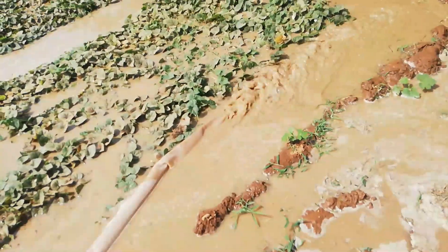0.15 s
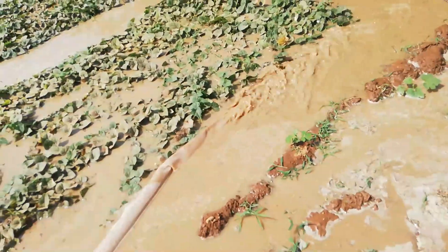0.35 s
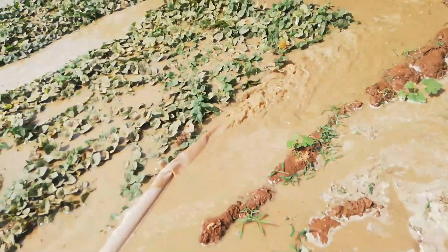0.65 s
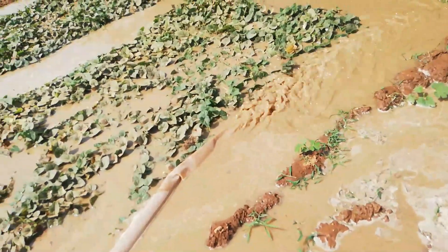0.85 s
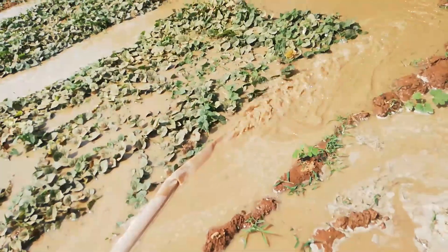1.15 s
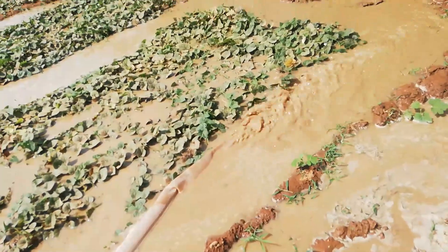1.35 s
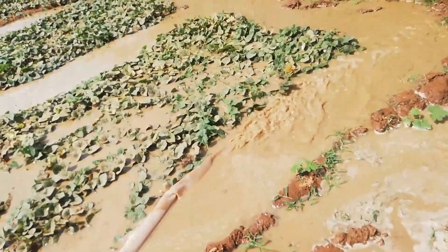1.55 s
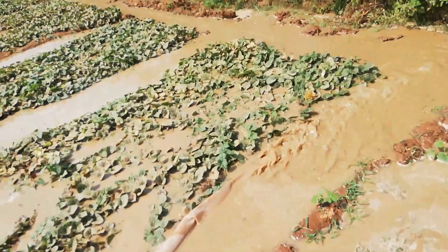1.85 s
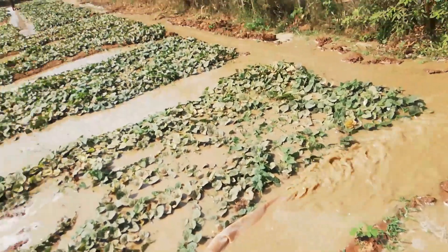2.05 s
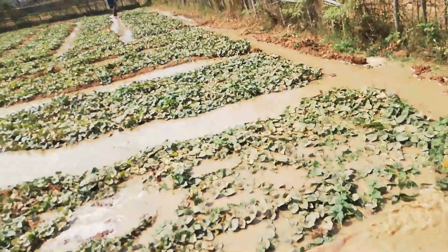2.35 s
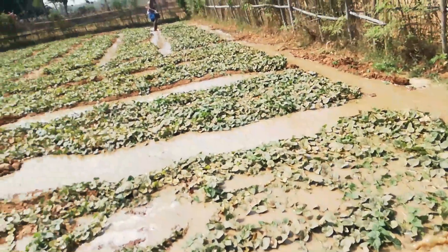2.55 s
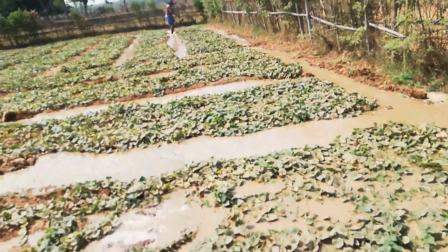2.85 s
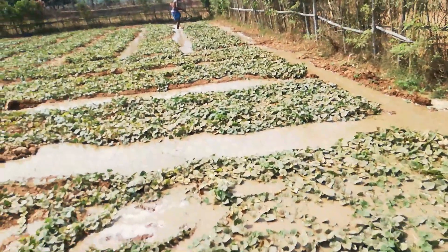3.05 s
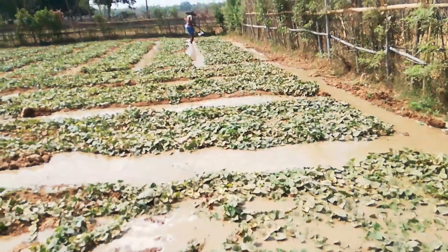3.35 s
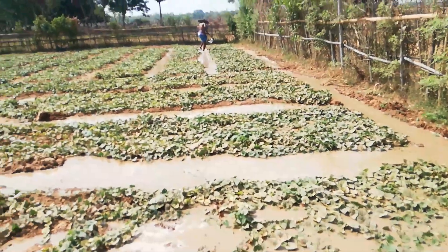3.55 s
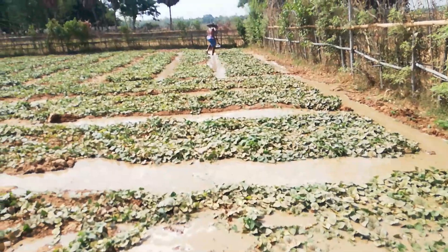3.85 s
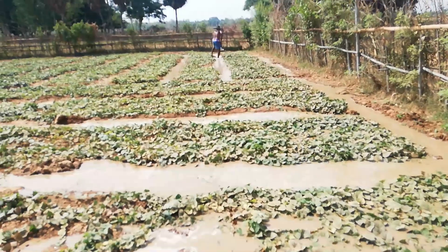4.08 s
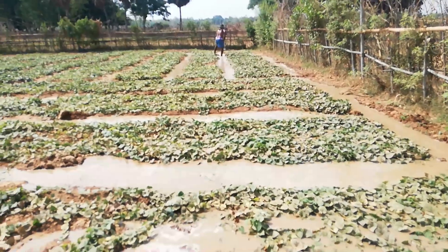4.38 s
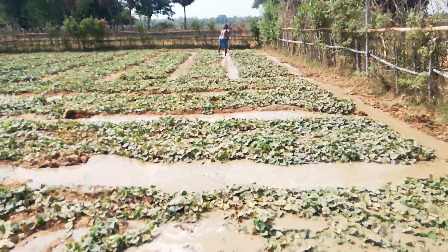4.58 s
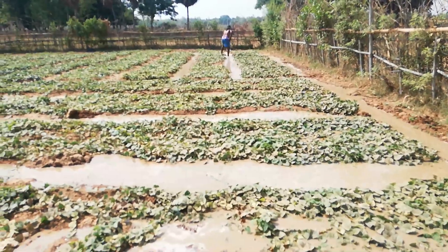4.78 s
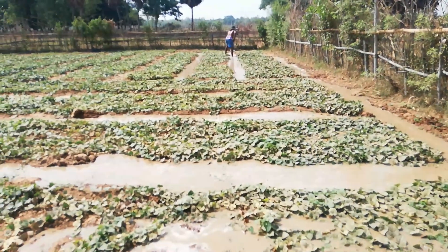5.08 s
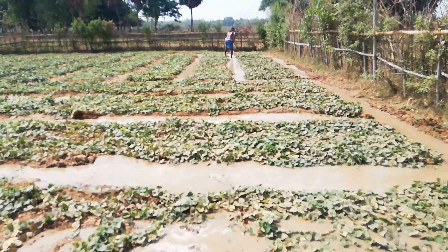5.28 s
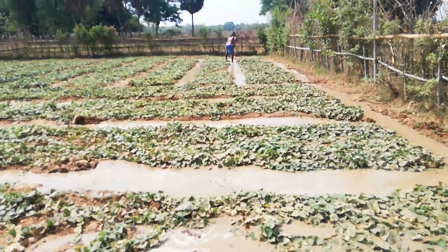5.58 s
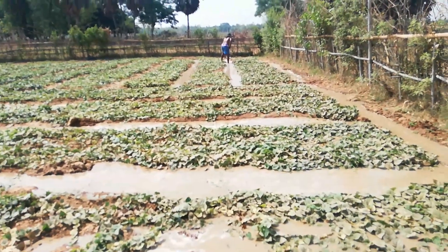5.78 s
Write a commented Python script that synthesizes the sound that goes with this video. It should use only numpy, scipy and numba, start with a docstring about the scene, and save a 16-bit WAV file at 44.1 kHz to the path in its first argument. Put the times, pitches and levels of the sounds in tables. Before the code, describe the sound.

Water gushes from a hose into a flooded field furrow, splashing and bubbling brightly, while a distant pump engine thumps softly outdoors.

```python
"""Water gushes from a hose into a flooded furrow, a step to the right of a hand-held phone that is tilted
up to the horizon. The splashing is thousands of short ringing bubbles, with loud single ones on top; they
reach the phone's two microphone ports with different colours and lags. Far off, a single-cylinder pump
engine thumps: its puffs ring an exhaust pipe. Light wind and a distant rumble are dark filtered noise.
"""
import sys
import numpy as np
from scipy import signal
from scipy.fft import rfft, irfft
from scipy.io import wavfile
from scipy.ndimage import uniform_filter1d
from numba import njit

SR = 44100
rng = np.random.default_rng(int(sys.argv[2]) if len(sys.argv) > 2 else 0)


def put_to_file(sound):
    """Save the sound as 16-bit audio at rate SR, in the file named by the first command-line argument."""
    columns = np.atleast_2d(sound).T  # one column per channel
    safe = np.clip(columns, -1, 1)
    whole_steps = np.round(safe * 32767)
    wavfile.write(sys.argv[1], SR, whole_steps.astype(np.int16))


N = 261072

# Tone of the distant rumble: [f/Hz, relative level/dB]
RUMBLE_COLOUR = [(12, -22), (25, -21), (80, -1.5), (130, -5.5), (200, -13.5), (280, -18.5), (370, -39.5),
                 (460, -33), (600, -63), (1000, -92)]
RUMBLE_DB = -57.5  # middle level, around which it drifts

# Wind gusts on the ports: [time of peak t/s, peak level/dB, time to fade by 10 dB/s (at least 0.03 is used)]
WIND_GUSTS = [(.66, -48.5, .15), (.79, -44.5, 0.72), (.85, -47, -0.04), (.925, -36.5, -0.13),
              (.975, -50, -0.1), (1.09, -47.5, -0.47), (1.22, -45.5, -0.01), (1.385, -52, -0.5),
              (1.56, -60, 0.3), (1.75, -54, 0.23), (2.03, -50, -0.3), (2.3, -63, .2), (2.55, -60, 1.5),
              (2.83, -49.5, 0.12), (3.0, -65, 2.1)]
GUST_RISE_S = 0.018  # time for the last 10 dB of the rise
# Steady breeze under the gusts: [t/s, level/dB]
BREEZE_LEVEL = [(0, -60), (.3, -68), (1.1, -59), (1.5, -57), (3.2, -70), (4.5, -68), (5.92, -70)]
# Tone of wind on the ports: [f/Hz, relative level/dB]
WIND_COLOUR = [(10, -13.5), (30, -6), (60, -5), (110, -9.5), (200, -32.5), (400, -56), (1000, -91)]

# Speed of the pump engine: [t/s, firings per second f/Hz]
FIRING_RATE = [(0, 17.25), (1.6, 17.28), (3, 17.24), (5.3, 17.255), (5.92, 17.08)]
# Engine thumps as the air carries them: [t/s, level/dB]
ENGINE_LEVEL = [(0, -53.5), (2, -55.5), (3.5, -56.5), (4.4, -55.5), (4.65, -56), (5.92, -57)]
START_TURN = 0.44  # share of the firing cycle already gone at 0 s
EXHAUST_HZ, EXHAUST_WIDTH_HZ = 134.3, 123

# How the phone is held: [t/s, tilt (0 = down at the water, 1 = at the horizon)]
PHONE_TILT = [(0, 0.018), (1.5, 0.12), (2.0, 0.35), (2.6, 0.95), (5.92, 0.95)]
# How much later the left port hears the water: [lag pointing down/ms, lag at the horizon/ms]
LEFT_PORT_LAG_MS = (0, .22)
# Colour of the water at each port, phone down or up: [f/Hz, relative level/dB]
LEFT_PORT_DOWN = [(250, -14), (440, -5.6), (720, -.8), (790, 3.6), (1000, 3.3), (1590, 6.9), (1850, 1.1),
                  (2150, 2.8), (2440, -1.9), (3630, 1.1), (4900, -2.7), (8060, -1.5), (9360, -3),
                  (13950, -15.4), (15800, -27)]
RIGHT_PORT_DOWN = [(250, -23), (470, -4.5), (790, 9.5), (1030, 3), (1250, 7), (1680, 4.5), (1850, 0.5),
                   (2200, 4.5), (3290, 5), (4110, 1), (5020, 6.5), (5980, 2.5), (8060, 9), (11710, 6),
                   (15800, -7)]
LEFT_PORT_UP = [(250, -5), (390, -1.5), (650, -1.5), (810, -6), (1100, 5), (1410, -3.5), (1720, 6.5),
                (2000, -5.5), (2560, 3), (4010, -4), (4770, 1), (8470, 3), (14300, -6), (15800, -29)]
RIGHT_PORT_UP = [(250, -17.5), (390, -1.5), (650, 5), (970, 8.5), (1120, 6.5), (1390, -5), (1700, -2.5),
                 (2200, 3.5), (2700, 1), (3910, 4), (5020, -2.5), (6300, 9.5), (8060, 17.5), (9200, 14),
                 (11000, 3.5), (12620, 4), (15800, -9.5)]

# Loud single bubbles: [start t/s, pitch f/Hz, peak level/dB at the port that favours the pitch]
LOUD_BUBBLES = [(0.013, 1366, -37.5), (0.017, 9800, -32), (0.0573, 10300, -34), (0.2186, 8500, -28),
                (0.274, 3060, -39.5), (0.282, 8850, -27), (0.2578, 1110, -42), (.252, 895, -42.5),
                (.165, 2170, -46), (0.296, 2240, -40), (.334, 850, -47), (.425, 800, -47), (.455, 807, -45),
                (0.287, 1690, -40), (.4349, 10000, -31), (0.45, 1580, -38.5), (1.282, 8700, -27.5),
                (1.374, 5460, -36), (1.43, 5400, -36), (1.851, 5940, -26.5), (2.028, 8400, -28.5),
                (.461, 2260, -37), (.132, 910, -44.5), (.1573, 5070, -28), (0.0952, 10550, -22),
                (.1152, 8600, -23), (0.1837, 7700, -22), (.2652, 1626, -34), (0.31, 1540, -37.5),
                (0.378, 1520, -38.5), (.431, 2250, -36), (.403, 1490, -34), (0.414, 1475, -36),
                (0.4496, 10300, -28), (0.45, 5140, -28.5), (0.524, 2210, -32), (0.528, 7850, -25),
                (0.56, 8240, -24.5), (.5981, 725, -39), (.6256, 8900, -18.5), (0.655, 11800, -18.5),
                (.656, 882, -38), (0.7032, 5100, -29.5), (.697, 840, -38.5), (.7059, 3380, -33),
                (0.7288, 3000, -34), (.7293, 6450, -34), (0.742, 2700, -37), (0.8042, 10100, -18),
                (0.832, 3630, -31), (0.848, 7400, -24.5), (.8915, 5330, -29.5), (0.892, 7860, -24.5),
                (0.9155, 7850, -21), (.9454, 8300, -19.5), (0.949, 4700, -29), (0.952, 7300, -23),
                (0.965, 5100, -26), (1.023, 2970, -36.5), (1.0531, 747, -39), (1.0626, 3390, -34.5),
                (1.0636, 8400, -25.5), (1.101, 4630, -29.5), (1.224, 820, -38.5), (1.3976, 7850, -25),
                (1.4657, 3330, -30), (1.5854, 8000, -22), (1.5922, 6060, -29), (1.6168, 745, -39),
                (1.832, 1214, -44), (1.837, 5420, -27), (1.888, 1400, -40.5), (1.922, 8300, -26),
                (1.926, 934, -40), (1.9308, 7650, -25), (1.954, 2240, -37), (2.0067, 6440, -23),
                (2.0594, 798, -43.5), (2.0972, 8000, -25), (2.112, 8300, -26), (2.13, 8200, -27),
                (2.1107, 5040, -29), (2.1197, 8000, -26), (2.1513, 8400, -23.5), (2.17, 726, -42.5),
                (2.21, 8100, -26), (2.222, 692, -42.5), (2.2, 9400, -33), (2.374, 9500, -32),
                (2.3904, 8340, -23.5), (2.4695, 7670, -24), (2.4859, 7600, -25), (2.498, 842, -40),
                (2.5457, 912, -33), (2.5989, 4180, -32.5), (2.6061, 795, -38.5), (2.7692, 6500, -29),
                (2.783, 7500, -22.5), (2.7938, 4730, -31.5), (2.841, 9300, -31), (2.8555, 6640, -24.5),
                (3.043, 9000, -29), (3.143, 8900, -28.5), (3.163, 6500, -28), (2.8809, 6750, -22),
                (2.878, 8700, -25), (2.894, 3170, -28.5), (2.917, 806, -40), (2.937, 832, -40.5),
                (2.9424, 7670, -18), (2.953, 8450, -23), (2.9978, 3250, -34), (3.008, 7030, -18.5),
                (3.0546, 8860, -23.5), (3.093, 8200, -23), (3.2743, 9100, -24.5), (3.2932, 6400, -25),
                (3.3036, 1670, -34.5), (3.32, 953, -40), (3.361, 1346, -35), (3.407, 4160, -29),
                (3.4272, 8100, -21), (3.499, 3100, -30.5), (3.5479, 7400, -25), (3.5793, 8350, -24),
                (3.591, 4520, -37.5), (3.6308, 8200, -28), (3.7764, 3700, -38.5), (3.8288, 3310, -36.5),
                (3.8363, 6640, -27.5), (3.863, 1010, -43.5), (3.9246, 9600, -32), (4.2728, 3680, -35),
                (4.3077, 7300, -28), (4.48, 3930, -40), (4.4853, 8400, -26), (4.5133, 4370, -38),
                (4.592, 9040, -25.5), (4.7048, 8900, -28), (4.7577, 6600, -34), (4.837, 7230, -25.5),
                (4.9857, 8150, -27.5), (5.165, 7300, -37), (5.18, 3400, -40), (5.194, 3240, -34),
                (5.2, 8100, -35), (5.232, 8350, -29), (5.239, 8160, -31), (5.359, 8950, -37),
                (5.385, 7550, -35), (5.418, 9200, -29), (5.713, 9000, -33), (5.795, 8450, -27),
                (5.658, 8800, -29.5), (5.6801, 6960, -35), (5.8353, 7850, -27.5), (4.2326, 8150, -27.5),
                (4.2366, 2900, -31.5), (4.3074, 816, -38), (4.7242, 7350, -22), (4.8031, 588, -44),
                (5.1378, 687, -41), (5.146, 3580, -38), (5.2, 2900, -32), (5.223, 8040, -20),
                (5.337, 2580, -30), (5.511, 1880, -36), (5.519, 3130, -37), (5.698, 2210, -38),
                (5.7853, 8440, -22.5), (5.807, 3363, -38.5), (5.8584, 7900, -27), (5.8848, 7900, -21)]
NEAR_CONTRAST = 1.6  # close bubbles feel the port difference this many times over
CRACK_DB = -7.5  # crack against its bubble, for pitches of 6000 Hz and up

# Swarms of random bubbles: [lowest f/Hz, highest f/Hz, splashes per second, bubbles per splash,
# mean delay in the clump/ms, pitch wander (0-1), cycles to the peak before scatter, size scatter/dB,
# half the largest extra lag/ms, level in the mix before evening out/dB]
BUBBLE_SWARMS = [(298.8, 1300, 45, 4, 18, .12, 4.3, 1.5, 0.15, -14),
                 (991, 2980, 45, 6, 14, .1, 4.9, 2.5, 0.061, -13.5),
                 (2465, 6380, 72, 12, 14, 0.1, 4.4, 0.5, 0.016, -14),
                 (4856, 16560, 90, 25, 9, .5, 4.55, 7.5, 0.069, -5.5),
                 (5430, 8100, 60, 5, 6, 0.1, 0.26, 0, 0.036, -9.5),
                 (2530, 14200, 260, 2, 1.5, 0.11, 0.63, 4.5, 0.034, -6.5),
                 (294, 14800, 8700, 1, 1, 0, 0.52, -1, 0.067, -5)]
# Splashing as heard: [t/s, gurgle level/dB, splatter level/dB, hiss level/dB]
WATER_FLOW = [(0.0, -50.5, -57.5, -49), (0.22, -54.5, -54, -48), (0.6, -52.5, -57.5, -50),
              (.76, -52, -53, -53.5), (0.9, -51.5, -54.5, -47.5), (1.08, -51.5, -56, -49),
              (1.24, -57, -61.5, -54.5), (1.38, -53.5, -54.5, -51), (1.56, -50.5, -55.5, -52),
              (1.76, -55.5, -56, -53), (1.98, -51, -56, -51.5), (2.12, -55, -55, -53.5),
              (2.3, -59, -60.5, -52), (2.64, -55, -54, -53), (2.82, -55, -57, -53),
              (3.0, -53.5, -52, -50.5), (3.15, -53, -56, -51.5), (3.3, -52, -55, -48), (3.6, -55, -55, -53),
              (3.96, -54, -57.5, -53), (4.18, -56, -58, -55), (4.4, -56.5, -56.5, -53.5),
              (4.65, -57.5, -57.5, -54.5), (4.85, -55.5, -58, -53), (5.09, -59, -58, -56.5),
              (5.16, -54.5, -53, -54), (5.24, -54, -54, -53.5), (5.31, -59, -61, -57.5),
              (5.5, -54.5, -55, -55), (5.6, -57, -59.5, -58.5), (5.67, -59.5, -57.5, -57.5),
              (5.8, -57, -61.5, -54.5), (5.92, -58.5, -55.5, -52.5)]
SPLATTER_FROM_HZ, HISS_FROM_HZ = 2500, 6000

TOP_HZ = 15900


def undb(db):
    """Turns decibels into a plain multiplier for the sound wave."""
    return 10 ** (np.asarray(db) / 20)


def level(x, db):
    """Sets the average strength (RMS) of a sound."""
    return x * undb(db) / np.sqrt(np.mean(x ** 2))


def curve(rows, at=None):
    """Reads a (time, value) table at every sample or at given times, with straight lines between."""
    s, v = np.transpose(rows)
    return np.interp(np.arange(N) / SR if at is None else at, s, v)


def walk(rate):
    """Random levels, each held for 1 / rate seconds, then smoothed twice; spread near 1."""
    k = int(SR / rate)
    steps = np.repeat(rng.standard_normal(N // k + 1), k)
    return 1.3 * uniform_filter1d(uniform_filter1d(steps, k), k)[:N]


def steady(x, db, span_s):
    """Evens out a two-port sound over stretches of span_s seconds and makes it follow a level curve."""
    k = int(span_s * SR)
    power = uniform_filter1d(uniform_filter1d(x.mean(axis=0) ** 2, k), k)
    return x * undb(db) / np.sqrt(power)


def colour(x, points):
    """Shapes the tone through (Hz, dB) points with a filter that never sounds before its input."""
    hz, db = np.transpose(points)
    f = np.linspace(1, SR / 2, 2049)
    log_gain = np.interp(np.log(f), np.log(hz), db) * np.log(10) / 20
    # folding the cepstrum (the spectrum of the log gain) forward in time makes the filter causal
    cepstrum = irfft(log_gain)
    cepstrum[1:2048] *= 2
    cepstrum[2049:] = 0
    response = irfft(np.exp(rfft(cepstrum)))
    return signal.fftconvolve(x, response)[:N]


def low_noise(points, own_db):
    """Dark noise, nearly the same at both ports; own_db sets the part each port has to itself."""
    common, left_own, right_own = rng.standard_normal((3, N))
    ports = [colour(common + undb(own_db) * own, points) for own in (left_own, right_own)]
    return level(np.array(ports), 0)


def distant_rumble():
    """Dark noise from far off whose level drifts slowly."""
    return low_noise(RUMBLE_COLOUR, -12) * undb(RUMBLE_DB + 1.5 * walk(5))


def wind():
    """A light breeze and short gusts that jump up and fade buffet the ports in quick flutters."""
    buffet = low_noise(WIND_COLOUR, -17)
    t = np.arange(N) / SR
    power = undb(2 * curve(BREEZE_LEVEL))  # doubled dB turn wave size into power
    for peak_s, peak_db, fade_s in WIND_GUSTS:
        rise = (peak_s - t) / GUST_RISE_S
        fade = (t - peak_s) / max(fade_s, 0.03)
        power += undb(2 * peak_db - 20 * np.maximum(rise, fade))
    flutter = buffet * undb(1.5 * walk(16))
    return steady(flutter, 10 * np.log10(power), span_s=0.05)


def ring(x, hz, width_hz):
    """A resonance: the sound rings at one pitch, and the wider the band the sooner it dies."""
    return signal.lfilter(*signal.iirpeak(hz, hz / width_hz, fs=SR), x)


def engine():
    """One puff per firing rings a short fat exhaust pipe; its open end sends an inverted echo after it."""
    turns = START_TURN + np.cumsum(curve(FIRING_RATE)) / SR
    firings = np.flatnonzero(np.diff(np.floor(turns)))
    puffs = np.zeros(N)
    puffs[firings] = undb(1.07 * rng.standard_normal(len(firings)))
    for _ in range(3):
        puffs = ring(puffs, EXHAUST_HZ, EXHAUST_WIDTH_HZ)
    puffs = signal.lfilter(*signal.butter(2, 320, fs=SR), puffs)  # distance dulls the edge
    echo = undb(-7) * np.roll(puffs, int(0.0076 * SR))
    thump = level(puffs - echo, 0) * undb(curve(ENGINE_LEVEL))
    left = np.roll(thump, int(0.0004 * SR))  # the left port hears it 0.4 ms later
    return np.array([left, thump])


@njit
def bubbles(n, sr, start, hz, cycles, size, glide):
    """Each bubble swells for some cycles, dies away and rises in pitch as it nears the surface."""
    out = np.zeros(n)
    for k in range(len(start)):
        swell_s = cycles[k] / hz[k]
        first = int(np.ceil(start[k] * sr))
        for i in range(max(first, 0), min(first + int(6 * swell_s * sr), n)):
            u = (i / sr - start[k]) / swell_s  # age, 1 at the loudest point
            wave = np.sin(2 * np.pi * cycles[k] * u * (1 + glide * u))
            out[i] += size[k] * u * np.exp(1 - u) * wave
    return out


def both_ports(s, hz, cycles, left, right, glide, spread_ms):
    """The same bubbles at both ports; the left lag grows as the phone tilts up, plus each bubble's own."""
    down, up = LEFT_PORT_LAG_MS
    lag_s = (down + (up - down) * curve(PHONE_TILT, s) + spread_ms) / 1000
    heard_left = bubbles(N, 1.0 * SR, s + lag_s, hz, cycles, left, glide)
    heard_right = bubbles(N, 1.0 * SR, s, hz, cycles, right, glide)
    return np.array([heard_left, heard_right])


def port_db(down, up, s, hz):
    """Gain of one port for given pitches at given times, blended by the tilt of the phone."""
    tilt = np.clip(curve(PHONE_TILT, s), 0, 1)

    def read(points):
        f, db = np.transpose(points)
        return np.interp(np.log(hz), np.log(f), db)

    return (1 - tilt) * read(down) + tilt * read(up)


def loud_bubbles():
    """The loudest single bubbles: small bright ones burst with a broad crack, and each trails fainter kin."""
    s, hz, db = np.transpose(LOUD_BUBBLES)
    left_db = port_db(LEFT_PORT_DOWN, LEFT_PORT_UP, s, hz)
    right_db = port_db(RIGHT_PORT_DOWN, RIGHT_PORT_UP, s, hz)
    pan_db = NEAR_CONTRAST * (left_db - right_db)
    # only the less favoured port is turned down
    left = undb(db + np.minimum(pan_db, 0))
    right = undb(db - np.maximum(pan_db, 0))
    same = np.ones(len(s))
    out = both_ports(s, hz, 2.5 * (3000 / hz) ** 0.05, left, right, 0.0023, 0.0)
    crack = undb(CRACK_DB) * np.clip(hz / 6000, 0, 1) ** 2
    out += both_ports(s + 2.26 / hz, 11000 * same, 0.98 * same, left * crack, right * crack, 0.0, 0.0)
    # five fainter bubbles of similar pitch follow each one
    for after, shift, loss in rng.random((len(s), 3, 5)).T:
        kin = undb(-8.0 - 5.7 * loss)
        kin_s = s + (4 + 26 * after) / hz
        kin_hz = hz * (0.855 + 0.25 * shift)
        out += both_ports(kin_s, kin_hz, 1.26 * same, left * kin, right * kin, 0.0052, 0.0)
    return out


def swarm(lo_hz, hi_hz, rate, count, length_ms, wander, cycles, scatter_db, spread_ms, db):
    """Splashes at random moments; each sets off a clump of bubbles of kindred pitch that thins out."""
    # all bubbles of one splash share the first set of random numbers
    splash = np.repeat(rng.random((int(rate * N / SR), 4)), int(count), axis=0).T
    own = rng.random((splash.shape[1], 4)).T
    s = splash[0] * N / SR - np.log(1 - own[0]) * length_ms / 1000
    splash_hz = lo_hz + (hi_hz - lo_hz) * splash[1]
    hz = np.clip(splash_hz * (1 + wander * (2 * own[1] - 1)), 200, 18000)
    # many low ranks, a few high
    rank = np.minimum(-np.log(1 - splash[2]) * 0.5 - np.log(1 - own[2]) * 0.5, 3.0)
    size = undb(scatter_db * rank) * np.sqrt(hz)  # small bubbles are short, so louder for even energy
    lag_ms = spread_ms * 2 * (2 * splash[3] - 1)  # every splash comes from its own direction
    swell_cycles = cycles * (0.53 + 0.83 * own[3])
    return level(both_ports(s, hz, swell_cycles, size, size, 0.012, lag_ms), db)


def low_part(x, hz):
    """Keeps what lies below a frequency, without shifting it in time."""
    return signal.sosfiltfilt(signal.butter(3, hz, fs=SR, output="sos"), x)


def splashing():
    """All swarms, evened to a flat spectrum, take each port's colour; gurgle, splatter and hiss swell apart."""
    surge = undb(0.42 * walk(15) + 1.29 * walk(60))
    spectrum = rfft(sum(swarm(*row) for row in BUBBLE_SWARMS) * surge)
    power = uniform_filter1d(np.mean(np.abs(spectrum) ** 2, axis=0), size=1500)
    water = irfft(spectrum / np.sqrt(power), N)
    tilt = np.clip(curve(PHONE_TILT), 0, 1)
    left = (1 - tilt) * colour(water[0], LEFT_PORT_DOWN) + tilt * colour(water[0], LEFT_PORT_UP)
    right = (1 - tilt) * colour(water[1], RIGHT_PORT_DOWN) + tilt * colour(water[1], RIGHT_PORT_UP)
    heard = np.array([left, right])
    gurgle = low_part(heard, SPLATTER_FROM_HZ)
    below_hiss = low_part(heard, HISS_FROM_HZ)
    bands = gurgle, below_hiss - gurgle, heard - below_hiss
    s, *levels_db = np.transpose(WATER_FLOW)
    t = np.arange(N) / SR
    return sum(steady(x, np.interp(t, s, db), span_s=0.15) for x, db in zip(bands, levels_db))


def scene():
    """Adds up all layers, from the background to the water."""
    return distant_rumble() + wind() + engine() + loud_bubbles() + splashing()


def record(dry):
    """The phone cuts the top: a steep low-pass filter removes what lies above TOP_HZ."""
    return signal.sosfilt(signal.ellip(10, 0.2, 80, TOP_HZ, fs=SR, output="sos"), dry)


dry = scene()
out = record(dry)
put_to_file(out)
```